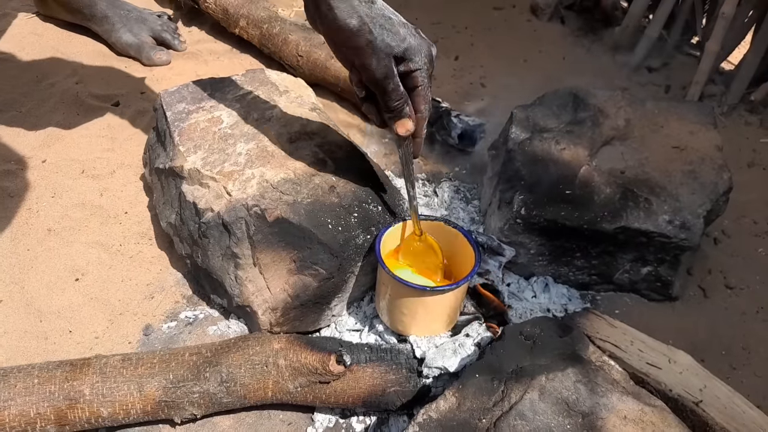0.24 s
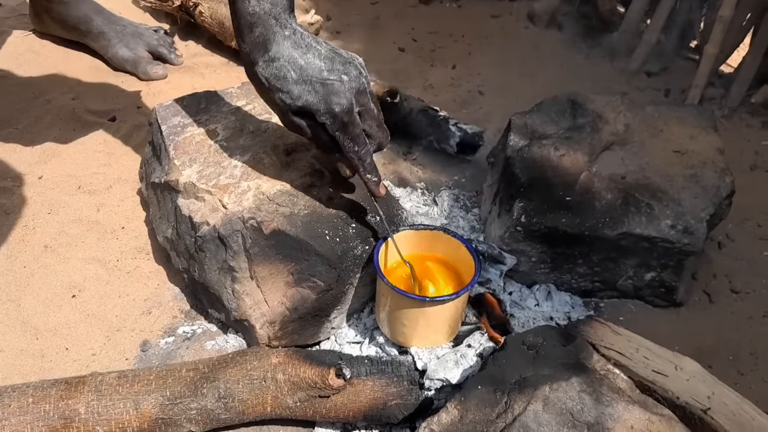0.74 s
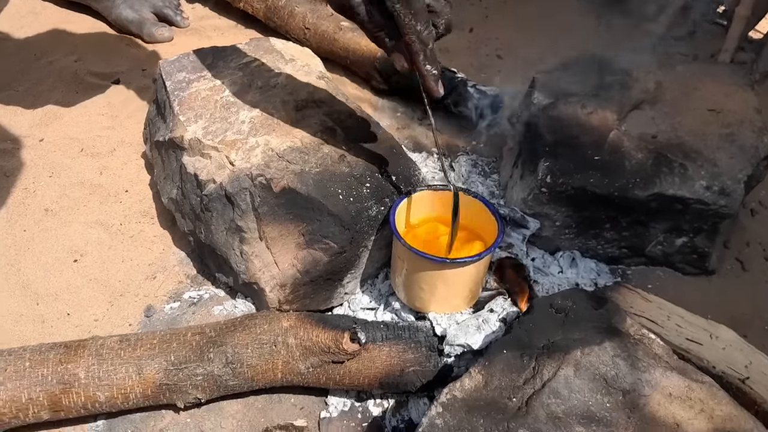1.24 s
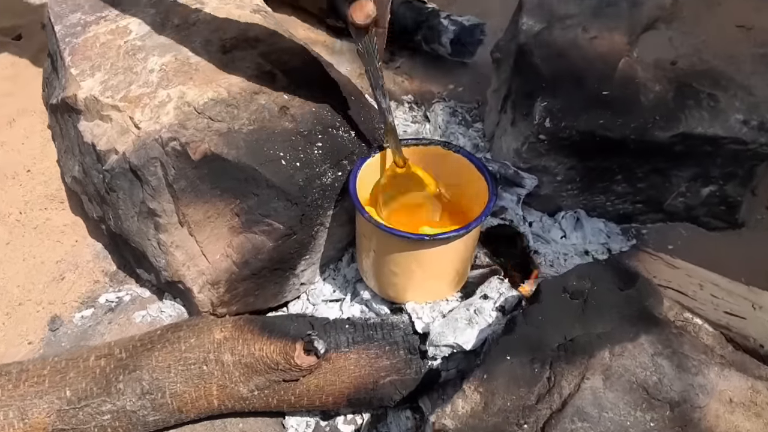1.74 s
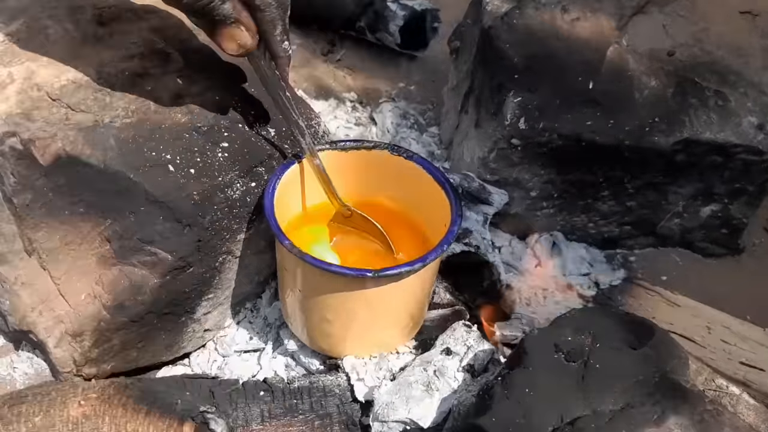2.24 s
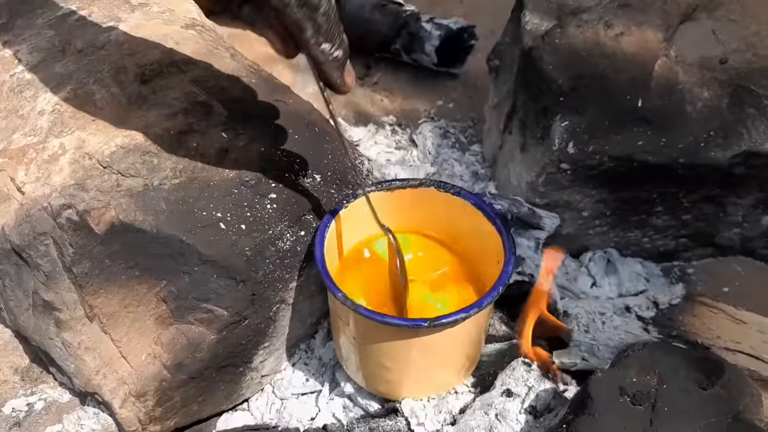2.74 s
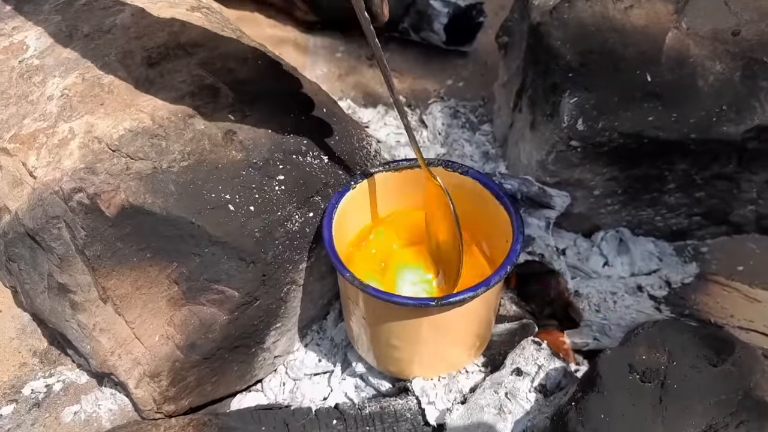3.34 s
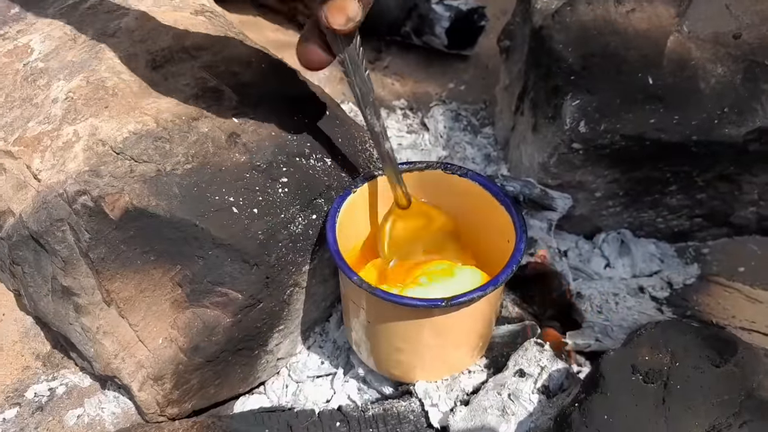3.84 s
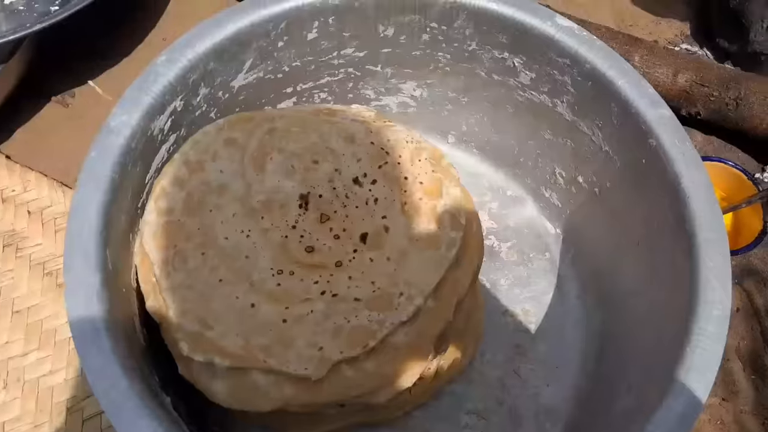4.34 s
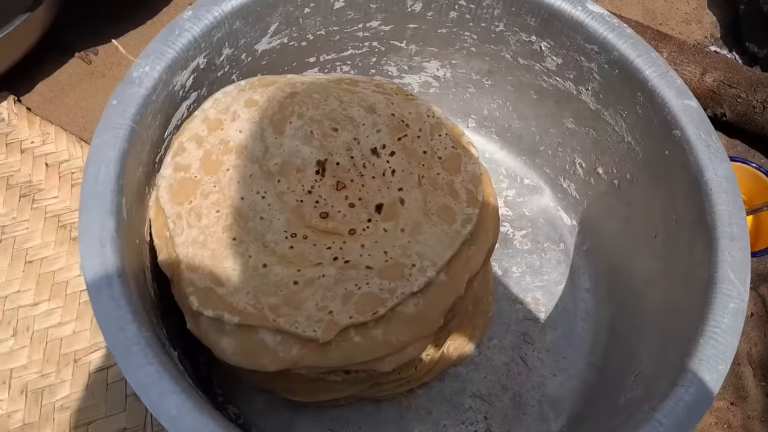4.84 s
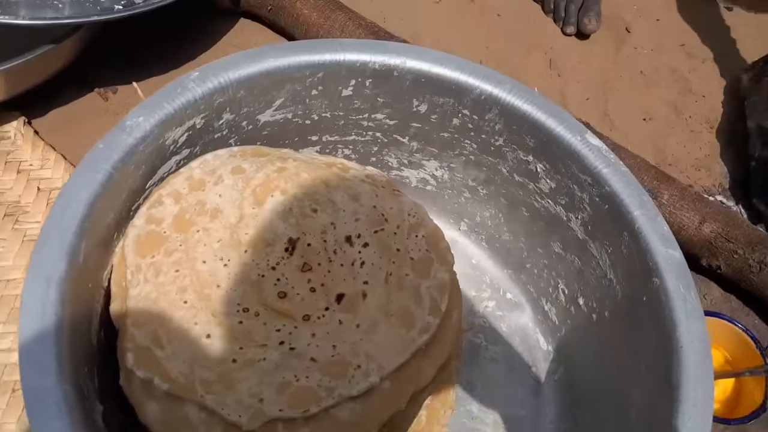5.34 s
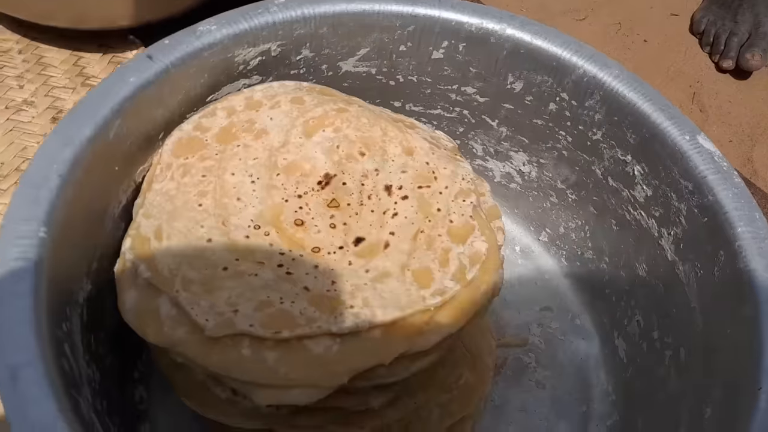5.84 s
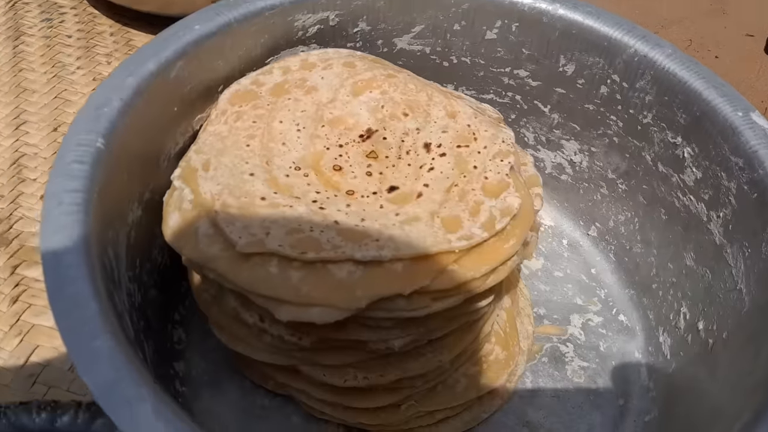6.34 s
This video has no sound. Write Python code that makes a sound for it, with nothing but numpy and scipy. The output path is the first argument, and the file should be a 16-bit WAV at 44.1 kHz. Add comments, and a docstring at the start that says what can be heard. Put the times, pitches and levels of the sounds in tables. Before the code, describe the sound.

Outdoors in gusty wind, a stirring spoon taps a mug while embers crackle, followed by a loud metal clank and dragging.

```python
"""Outdoors by a cooking fire. From the start wind buffets the two microphone ports and the fire hisses.
A spoon knocks a full enamel mug, exciting its damped modes, while embers tick and snap. Faint tones blip
far off; later come narrow streaks of noise, and single puffs push the microphone diaphragm.
From 4.7 s a metal vessel to the right is set down with a clank, bounces and is dragged twice:
impact and friction drive the same modes, and the ground answers with low booms."""
import sys
import numpy as np
from scipy import signal
from scipy.fft import rfft, irfft
from scipy.io import wavfile

SR = 44100
rng = np.random.default_rng(int(sys.argv[2]) if len(sys.argv) > 2 else 0)


def to_wav(sig):
    """Store sig (one row per channel, or 1-D mono) as 16-bit WAV at the path in sys.argv[1].

    Samples outside -1..1 are clipped; the rate is SR.
    """
    pcm = np.clip(np.atleast_2d(sig), -1, 1) * 32767
    pcm = np.round(pcm).astype(np.int16)
    wavfile.write(sys.argv[1], SR, pcm.T)  # frames by channels


N = 291060
BURST = 3000   # samples in a short transient
TIME_S = np.arange(N) / SR


def amp(db):
    """Decibels to amplitude ratio."""
    return 10 ** (np.asarray(db) / 20)


def unit_rms(x):
    """Normalise to rms 1."""
    return x / np.sqrt(np.mean(x ** 2) + 1e-20)


def envelope(rows):
    """Linear interpolation of a level curve, one value per sample."""
    return np.interp(TIME_S, *np.transpose(rows))


def sides(pan_db):
    """Level difference as a column of left and right gains; positive is left."""
    return amp([[pan_db / 2], [-pan_db / 2]])


def add(out, start_s, burst):
    """Superpose a stereo burst."""
    at = round(start_s * SR)
    out[:, at:at + burst.shape[1]] += burst[:, :N - at]


def drift(rate_hz):
    """Low-passed noise: a slow random fluctuation of rms 1."""
    r = np.exp(-80 * np.pi * rate_hz / SR)
    slow = signal.lfilter([1], [1, -2 * r, r * r], rng.standard_normal(N // 40 + 2002))[2000:]
    return np.interp(np.arange(N) / 40, np.arange(len(slow)), unit_rms(slow))


def swells(rows):
    """Incoherent addition: bell-shaped swells sum in power at each port."""
    power = np.zeros((2, N))
    for centre_s, db, length_s, pan_db in rows:
        bell = np.exp(-(2 * (TIME_S - centre_s) / length_s) ** 2)
        power += (amp(db) * unit_rms(sides(pan_db)) * bell) ** 2
    return power


def coloured(spectrum, shared, noises):
    """Partial coherence: one common and two independent noises, shaped for each port; joint rms 1."""
    hz, *port_db = np.transpose(spectrum)
    log_hz = np.log(np.arange(N // 2 + 1) * SR / N + 1)
    shape = [amp(np.interp(log_hz, np.log(hz), db, left=-90, right=-90)) for db in port_db]
    pair = np.sqrt(shared) * noises[0] + np.sqrt(1 - shared) * noises[1:]
    return unit_rms(irfft(rfft(pair) * shape, N))


def crack(hz, t60, edge_ratio):
    """Exponentially decaying band noise, half shared by the ports."""
    shared, *own = rng.standard_normal((3, BURST))
    edges_hz = [hz / edge_ratio, min(hz * edge_ratio, .45 * SR)]
    band = signal.butter(2, edges_hz, "band", fs=SR, output="sos")
    decay = amp(-60 * TIME_S[:BURST] / max(t60, .002))
    return unit_rms(signal.sosfilt(band, shared + own)) * decay / 2


def ring(force, hz, t60):
    """Damped resonator: an impulse starts a sine that falls 60 dB in t60 seconds."""
    r, w = amp(-60 / (t60 * SR)), 2 * np.pi * hz / SR
    return signal.lfilter([0, np.sin(w)], [1, -2 * r * np.cos(w), r * r], force + 1e-18)


# vessel modes near 2-2.5 kHz that ring nearly in step at both ports: pitch_hz
IN_STEP_MODES = [2010, 2050, 2274, 2451]
def radiate(force, hz, t60, pan_db):
    """Directivity of one mode; for the listed ones a sign flip offsets the half-cycle port delay."""
    left_sign = -1 if hz in IN_STEP_MODES else 1
    return sides(pan_db) * [[left_sign], [1]] * ring(force, hz, t60)


def struck(modes, start_s, ring_db, tilt, pivot_hz, spread_db):
    """Modal superposition: each blow rings all modes; positive tilt (hard contact) favours high ones."""
    out, at = np.zeros((2, N)), np.round(start_s * SR).astype(int)
    chance_db = spread_db * rng.standard_normal((len(at), len(modes)))
    for k, (hz, mode_db, *_, t60, pan_db) in enumerate(modes):
        octaves = np.log2(max(hz, 400) / pivot_hz)
        force = np.zeros((2, N))
        force[:, at] = amp(ring_db + mode_db + tilt * octaves + chance_db[:, k])
        out += radiate(force, hz, t60, pan_db) * (-1) ** k
    return out


# reflections off the hearth: left_delay_s, gain_db
HEARTH_ECHOES = [(.0021, -12), (.0046, -13.5)]
def arrive(pair, left_lead_s):
    """Multipath propagation: a time difference between the ports, two echoes and diffuse scatter."""
    phase_per_s = -2j * np.pi * np.arange(N // 2 + 1) * SR / N
    lag_s = np.array([[-left_lead_s / 2], [left_lead_s / 2]])
    stretch = np.array([[1], [1.07]])   # echo paths are longer to the right port
    paths = 1 + sum(amp(db) * np.exp(phase_per_s * s * stretch) for s, db in HEARTH_ECHOES)
    t = TIME_S[:BURST]
    scatter = rng.standard_normal((2, BURST)) * amp(-41 - 60 * t / .07) * (t > .005)
    return irfft(rfft(pair) * np.exp(phase_per_s * lag_s) * (paths + rfft(scatter, N)), N)


# steady breeze: time_s, level_db
BREEZE = [(0, -57), (.6, -60.5), (1.1, -54.5), (2.05, -56), (3, -55), (3.9, -53), (4.6, -59.5), (5.3, -59),
          (5.7, -59), (6.05, -52.5), (6.6, -60)]
# buffets, most at the left port: centre_s, level_db, length_s, pan_db
WIND_BUFFETS = [(.72, -51, 0.047, 1), (1.32, -48, 0.06, 20), (1.49, -50, 0.095, 8), (1.655, -33, .04, 28),
                (1.72, -31.5, 0.063, 36), (1.78, -36, 0.033, 25), (1.87, -36.5, 0.13, 23),
                (2.15, -42, 0.046, 14), (2.24, -32.5, 0.071, 19), (2.38, -28, 0.12, 25),
                (2.44, -33.5, 0.15, 27), (2.92, -34.5, 0.082, 15), (3.005, -36, 0.12, 29),
                (3.14, -32, 0.085, 38), (3.255, -26, 0.047, 38), (3.36, -37.5, 0.082, 30),
                (3.49, -47, 0.12, 10), (3.56, -27, 0.087, 22), (3.99, -51, 0.044, 6),
                (4.19, -38.5, 0.035, -19), (5.13, -48, 0.077, -22), (5.22, -43, .04, -27)]
# relative spectral density of wind: frequency_hz, left_db, right_db
WIND_SPECTRUM = [(28, -36.5, -39), (45, 2, -3.5), (65, 4, -2), (105, -3.5, 3.5), (180, -22.5, -14.5),
                 (343, -40.5, -21)]
def wind():
    """Turbulent pressure: lumpy low noise, largely independent at each port, swollen by buffets."""
    lumps = amp(2.8 * np.array([drift(10), drift(12.2)]))
    gain = np.sqrt(amp(envelope(BREEZE)) ** 2 + swells(WIND_BUFFETS))
    return gain * lumps * coloured(WIND_SPECTRUM, shared=0.21, noises=rng.standard_normal((3, N)))


# strength of the hiss: time_s, level_db
HISS_LEVEL = [(0, -59.5), (.13, -58), (.28, -62.5), (.38, -57), (.57, -60), (.73, -54), (.86, -56),
              (1.01, -50), (1.19, -55), (1.45, -56), (1.7, -51.5), (1.92, -51.5), (2.06, -55.5),
              (2.45, -50.5), (2.7, -56.5), (3.05, -54), (3.49, -57), (3.93, -58), (4.23, -53), (4.67, -63),
              (4.87, -54.5), (5.5, -54.5), (5.62, -58), (6, -54.5), (6.32, -59.5), (6.6, -55)]
# relative spectral densities of hiss and rustle: frequency_hz, left_db, right_db
HISS_SPECTRUM = [(1200, -21.5, -21.5), (2344, -15.5, -2), (2800, -10, 0.5), (3490, -8, 1), (4600, -7, -3),
                 (6200, -8, -1.5), (6970, -6.5, 2), (7900, -7, -6.5), (8500, -0.5, -14), (8550, -6.5, -11),
                 (10400, -9, -7.5), (11100, -9, -12.5), (12600, -14, -9), (15730, -5, -9.5)]
RUSTLE_SPECTRUM = [(124, -3.5, -3), (232, -0.5, -6), (465, -12, -11.5), (900, -20, -21.5), (1446, -26, -20),
                   (2000, -21.5, -19), (3000, -33.5, -26.5)]
def fire_hiss():
    """Amplitude-modulated noise: a flickering hiss over a duller rustle that follows it and thins out."""
    level_db = envelope(HISS_LEVEL)
    hiss = coloured(HISS_SPECTRUM, shared=0.045, noises=rng.standard_normal((3, N)))
    hiss *= amp(level_db + 1.4 * drift(20))
    rustle = coloured(RUSTLE_SPECTRUM, shared=0.35, noises=rng.standard_normal((3, N)))
    rustle *= amp(level_db - 2.5 - 0.84 * TIME_S + 1.5 * drift(11))
    low_pass = signal.cheby2(8, 40, 15900, fs=SR, output="sos")
    return signal.sosfilt(low_pass, hiss) + rustle


# spoon on the mug: start_s, ring_db, tilt_db_per_octave, crack_db
SPOON_KNOCKS = [(0.017, -40, 1.5, -42), (0.074, -54, 9, -47), (0.121, -57, 10, -42),
                (0.374, -39, -0.5, -37), (0.419, -51, -6, -42), (0.703, -42, 0, -44),
                (0.779, -29, -2.5, -28.5), (0.918, -48, 5, -52), (1.207, -48, 0, -39),
                (1.486, -24, -2, -26.5), (1.954, -48, 3, -53), (2.226, -27.5, -3, -21.5),
                (2.885, -18, -3, -20.5), (3.563, -31.5, 3.5, -29.5), (4.053, -34, -4, -16)]
# modes of the full mug: pitch_hz, gain_db, t60_s, pan_db
MUG_MODES = [(416, -14, 0.015, -2.5), (640, -11, 0.041, -2.5), (900, -4, 0.021, 1), (1226, 9, 0.0093, 1),
             (1510, 11, 0.0063, -2.5), (1837, -5, 0.028, 1), (2360, -7.5, 0.015, -9),
             (3400, -10.5, 0.024, -7)]
def mug():
    """Impact excitation: modes damped by the filling knock dully under a crack of spoon on enamel."""
    start_s, ring_db, tilt, crack_db = np.transpose(SPOON_KNOCKS)
    out = struck(MUG_MODES, start_s, ring_db, tilt, pivot_hz=1200, spread_db=3.0) * sides(4)
    for s, db in zip(start_s, crack_db):
        add(out, s, amp(db) * crack(5500, t60=0.0081, edge_ratio=2.06))
    return arrive(out, left_lead_s=0.00024)


# loud snaps: start_s, level_db, centre_hz, t60_s, pan_db
EMBER_SNAPS = [(0.5273, -41.5, 3400, 0.011, -6), (0.6645, -48, 4040, 0.063, -5),
               (0.94, -43, 3630, 0.073, -1), (1.6473, -39.5, 3560, 0.019, 8),
               (1.996, -22, 2950, 0.0064, -17), (2.059, -42.5, 9000, 0.018, 9),
               (2.3486, -40.5, 3670, 0.031, -8), (2.399, -37.5, 3370, 0.051, -6),
               (2.9573, -38, 5700, 0.014, 9), (3.854, -46, 11900, 0.024, -5),
               (3.8878, -36.5, 7900, 0.01, 8), (4.0207, -25.5, 3520, 0.026, -1),
               (4.0528, -23, 3350, 0.054, -4), (4.087, -43, 4020, 0.017, 11), (4.11, -42, 3600, 0.01, 20),
               (4.15, -46.5, 8130, .02, 10), (4.1836, -43, 7300, .019, 3), (4.259, -42, 4570, 0.018, -3),
               (4.293, -43, 6540, 0.022, -21), (4.4686, -39, 3640, 0.02, -18),
               (6.561, -43.5, 8540, .031, 2), (6.5833, -39.5, 7600, 0.055, 10)]
def embers():
    """Impulsive noise: narrow-band snaps with a broad treble edge, and a random patter of tiny ticks."""
    out = np.zeros((2, N))
    for start_s, db, hz, t60, pan_db in EMBER_SNAPS:
        body = crack(hz, t60, edge_ratio=1.147)
        treble = amp(-4) * sides(10) * crack(8500, 1.18 * t60, edge_ratio=8.8)
        add(out, start_s, amp(db) * sides(pan_db) * (body + treble))
    for when, strength, pitch, pan in rng.random((160, 4)):
        tick = crack(3000 * 3.0 ** pitch, t60=0.0069, edge_ratio=1.12)
        add(out, when * N / SR, amp(-57.5 + 5.4 * strength ** 2) * sides(12 * pan - 8) * tick)
    return out


# faint tones far off: centre_s, level_db, pitch_hz, length_s
FAR_BLIPS = [(0.462, -64.5, 960, 0.092), (0.706, -62.5, 1200, 0.093), (0.992, -53, 1000, 0.043),
             (1.447, -64, 900, 0.044)]
def blips():
    """Tone pulses: sines under Gaussian envelopes."""
    return sum(amp(db) * np.exp(-8 * ((TIME_S - s) / length_s) ** 2) * np.sin(2 * np.pi * hz * TIME_S)
               for s, db, hz, length_s in FAR_BLIPS)


# spoon sliding on enamel or sap sizzling: centre_s, length_s, pitch_hz, width_hz, level_db, pan_db
NOISE_STREAKS = [(1.874, 0.41, 2090, 820, -58.5, -6), (3.2, 0.34, 9650, 220, -69.5, -11),
                 (1.99, 0.27, 550, 120, -62.5, 3)]
def streaks():
    """Resonant filtering: noise passes twice through a narrow resonance, swelling and fading."""
    out = np.zeros((2, N))
    for centre_s, length_s, hz, width_hz, db, pan_db in NOISE_STREAKS:
        t60 = np.log(1000) / (np.pi * width_hz)
        band = unit_rms(ring(ring(rng.standard_normal((2, N)), hz, t60), hz, t60))
        swell = np.exp(-(2 * (TIME_S - centre_s) / length_s) ** 4)
        out += amp(db) * sides(pan_db) * swell * band
    return out


# puffs on the right port: start_s, level_db, final_pitch_hz, t60_s, tick_db
AIR_PUFFS = [(2.497, -24.5, 70.5, 0.13, -38), (3.498, -32, 71.4, 0.11, -39.5),
             (4.175, -27.5, 65, 0.15, -34.5), (5.203, -29.5, 80.5, 0.058, -44)]
def puffs():
    """Damped oscillation: the diaphragm is pushed with a dull tick and swings back, falling in pitch."""
    out, t = np.zeros((2, N)), TIME_S[:4 * BURST]
    for start_s, db, hz, t60, tick_db in AIR_PUFFS:
        cycles = hz * (t + 0.0048 * (1 - np.exp(-t / 0.0055)))
        swing = np.sin(2 * np.pi * cycles) * amp(-60 * t / t60)
        add(out, start_s, amp(db) * swing * amp([[-24], [0]]))
        add(out, start_s, amp(tick_db) * sides(-5) * crack(1200, t60=0.0099, edge_ratio=3.0))
    return out


# natural frequencies of the vessel: pitch_hz
VESSEL_PITCHES = [88, 300, 420, 580, 690, 780, 1230, 1410, 1575, 1728, 2010, 2050, 2274, 2451, 2512, 2818,
                  2972, 3028, 3572, 3632, 4328, 4400, 5130, 5290, 5500, 5890, 6045, 6500, 6700, 7050]
# response of each mode: struck_db, dragged_db, t60_s, pan_db
VESSEL_RESPONSE = [(-36, -13, 0.23, -4.5), (-2.5, -8.5, 0.036, -1), (-8, -34.5, 0.13, -1),
                   (-23, -11.5, 0.046, -3), (-1.5, -4.5, 0.043, -5), (-5.5, -19.5, 0.12, 0),
                   (-17, -12, 0.075, 10), (-8.5, -11.5, 0.097, -2), (-0.5, -11.5, .15, 0.5),
                   (-15, -6.5, .12, 0), (-2, -21, .035, 8.5), (-10.5, -8, 0.094, -4.5),
                   (-20.5, -9.5, .08, 0), (-3, -6.5, 0.27, -9.5), (-15.5, -5, 0.31, -6),
                   (-20, -17.5, 0.18, 5), (-17.5, -11.5, 0.099, -14), (-11.5, -13, 0.06, -10),
                   (-13.5, -10.5, 0.21, 4), (-21.5, -14.5, 0.057, -9.5), (-20.5, -8, 0.063, -6),
                   (-14, -33, 0.036, -5), (-35, -20, .1, -5), (-23, -16.5, 0.075, -7.5),
                   (-33.5, -20, .06, -5.5), (-34.5, -13.5, 0.027, 2.5), (-34, -8.5, 0.05, -5),
                   (-35.5, -32, .1, -9.5), (-33.5, -16, 0.16, -3.5), (-31.5, -10, 0.062, -12)]
VESSEL_MODES = np.column_stack([VESSEL_PITCHES, VESSEL_RESPONSE])
# landings: start_s, ring_db, tilt_db_per_octave, crack_db, thud_db, thud_hz
VESSEL_BLOWS = [(4.711, -51, -1, -22.5, -42, 800), (4.745, -39, 17, -22, -33, 794),
                (4.769, -32.5, -5, -28, -27.5, 815), (4.799, -11.5, 0, -29, 0, 926),
                (4.806, -19, -1, -36, -34, 764), (4.854, -22, -4, -21.5, -16.5, 900),
                (4.861, -55, 0, -25, -18.5, 690), (4.889, -38, -6, -54, -29, 870),
                (4.909, -40, -7, -28.5, -15, 700), (4.934, -38.5, -4, -35, -29.5, 804),
                (5.254, -46, 15, -38, -41.5, 710), (5.549, -63, 5, -41.5, -41, 740),
                (5.83, -46, -2, -42.5, -23, 640), (5.857, -37.5, 4.5, -35, -59, 790),
                (6.085, -50, 3.5, -32, -72, 772)]
def vessel_blows(thud_t60_s=.027):
    """Impact excitation: the metal rings and cracks; the base thuds at a pitch set by where it lands."""
    start_s, ring_db, tilt, *contact = np.transpose(VESSEL_BLOWS)
    out = struck(VESSEL_MODES, start_s, ring_db, tilt, pivot_hz=2000, spread_db=2.5)
    impulse = np.arange(BURST) == 0
    for s, crack_db, thud_db, hz in zip(start_s, *contact):
        thud = ring(impulse, hz, thud_t60_s) - amp(-2.5) * ring(impulse, 1.167 * hz, 0.74 * thud_t60_s)
        add(out, s, amp(thud_db) * sides(-4.5) * thud)
        add(out, s, amp(crack_db) * crack(6350, t60=0.027, edge_ratio=1.2))
    return out


# how hard the vessel grinds over grit: time_s, level_db
DRAG_LEVEL = [(4.69, -83), (4.714, -38), (4.75, -40), (4.786, -40.5), (4.81, -39), (4.89, -39.5),
              (4.958, -48), (5.004, -55.5), (5.19, -50), (5.215, -47.5), (5.245, -45.5), (5.262, -42.5),
              (5.36, -48), (5.43, -56), (5.47, -48), (5.556, -50), (5.622, -70), (5.808, -64), (5.862, -44),
              (5.922, -49), (6.014, -66.5), (6.06, -50), (6.098, -43), (6.2, -98)]
def vessel_drag(grains_per_s=1500):
    """Friction as random micro-impacts: returns the ringing of the modes and the hiss of the grit."""
    level_db = envelope(DRAG_LEVEL)
    moving = (TIME_S > DRAG_LEVEL[0][0]) & (TIME_S < DRAG_LEVEL[-1][0])
    grains = rng.standard_normal((3, N)) * (rng.random(N) < grains_per_s / SR)
    grains *= amp(2.5 * drift(25))   # uneven grit
    ringing = np.zeros((2, N))
    for k, (hz, _, dragged_db, t60, pan_db) in enumerate(VESSEL_MODES):
        wander_db = 3.5 * drift(8)   # the contact point wanders and favours other modes
        tilt_db = -1.5 * np.log2(max(hz, 400) / 2000)
        force = moving * grains[k % 3] * amp(level_db - 9.5 + dragged_db + wander_db + tilt_db)
        ringing += radiate(force, hz, 0.76 * t60, pan_db)   # damped by the ground
    # frequency_hz, left_db, right_db
    spectrum = [(1008, -9.5, -14.5), (5000, -10, 0), (9000, -2, -3), (15160, -10, -11)]
    grit = coloured(spectrum, shared=0.2, noises=grains + 0.045 * rng.standard_normal((3, N)))
    return ringing, moving * amp(level_db - 10) * grit


def vessel():
    """Direct and reflected sound: blows and ringing arrive with echoes, the hiss of grit without."""
    blows = vessel_blows()
    ringing, grit = vessel_drag()
    return arrive(blows + ringing, left_lead_s=-0.00021) + grit


# vessel meeting the ground: centre_s, level_db, length_s, pan_db
GROUND_BOOMS = [(4.72, -35, 0.037, 2), (4.81, -34, 0.053, -3.5), (4.88, -35, .14, -1),
                (5.84, -37, 0.039, 1), (5.92, -50, 0.086, 0)]
def booms(band_hz=(60, 153)):
    """Forced vibration: the ground answers the vessel with a low rumble, coherent at both ports."""
    band = signal.butter(2, band_hz, "band", fs=SR, output="sos")
    return np.sqrt(swells(GROUND_BOOMS)) * unit_rms(signal.sosfilt(band, rng.standard_normal(N)))


def scene():
    """Linear superposition of all sources at the two ports."""
    return wind() + fire_hiss() + mug() + embers() + blips() + streaks() + puffs() + vessel() + booms()


def record(dry):
    """Band limiting and saturation: the microphone drops deep bass, clips peaks and cuts the top."""
    high_pass = signal.butter(4, 38, "high", fs=SR, output="sos")
    low_pass = signal.cheby2(12, 70, 16460, fs=SR, output="sos")
    clipped = np.clip(signal.sosfilt(high_pass, dry), -1, 1)
    return signal.sosfilt(low_pass, clipped)


dry = scene()
out = record(dry)
to_wav(out)
```